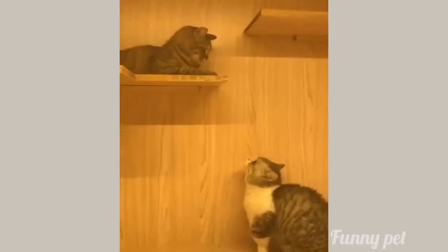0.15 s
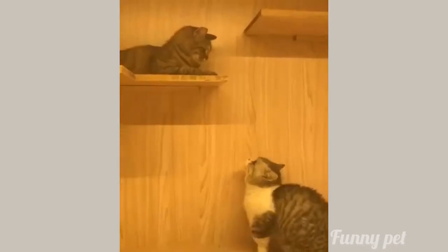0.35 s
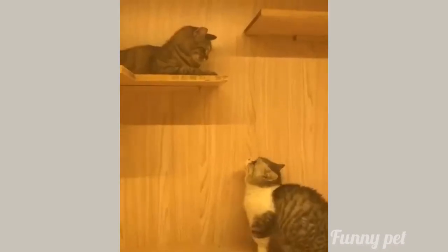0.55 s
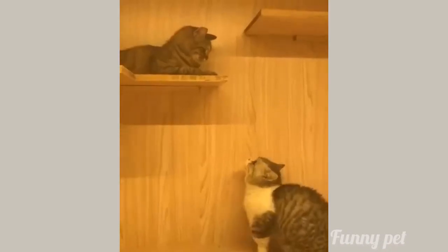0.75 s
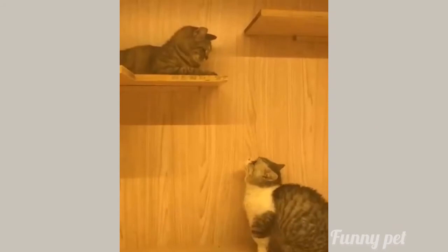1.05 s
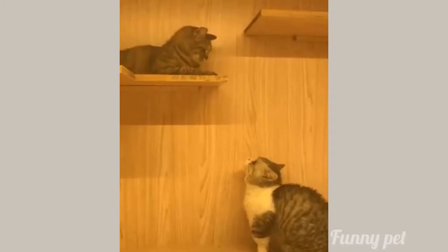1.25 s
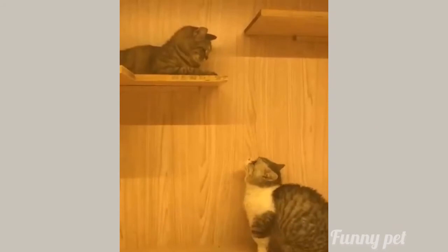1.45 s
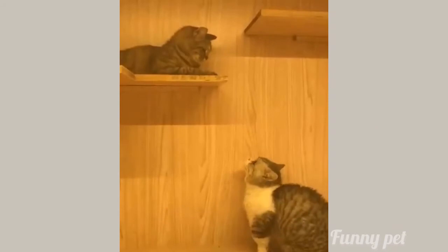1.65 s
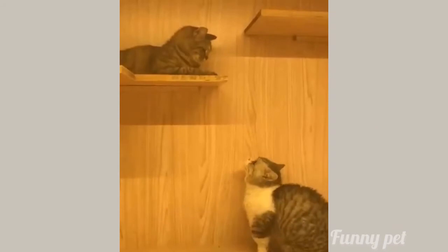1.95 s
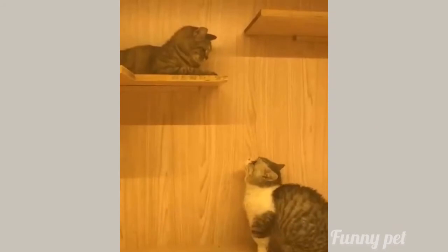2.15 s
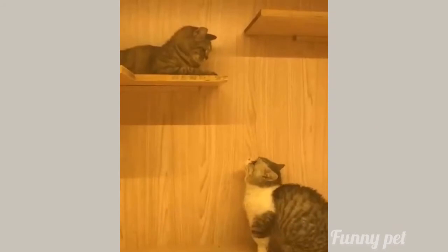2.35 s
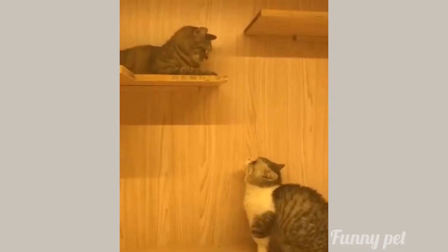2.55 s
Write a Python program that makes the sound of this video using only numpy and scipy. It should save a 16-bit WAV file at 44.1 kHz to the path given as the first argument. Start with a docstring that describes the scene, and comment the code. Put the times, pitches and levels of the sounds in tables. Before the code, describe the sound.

A cat's long, loud yowl rises about an octave, turns rough and breaks off in a rasp; after soft wooden knocks, a short yelp begins a second, lower yowl in a small wood-panelled room, close microphone.

```python
"""A long cat yowl comes first, over a low rumble: it climbs an octave as the mouth opens, splits into half-pitch
lines and breaks off in a rasp. After two soft knocks, a short yelp starts a second, lower yowl.
The place is a small wood-panelled room whose close walls answer the microphone at once. Each voice is a sum of
fold harmonics and half-pitch lines under moving resonances; hiss, rustles, knocks, thuds and rumble are shaped
noise; the gulps are sagging sines."""
import sys
import numpy as np
from scipy import signal
from scipy.fft import rfft, irfft
from scipy.io import wavfile
from scipy.ndimage import uniform_filter1d, minimum_filter1d

SR = 44100
rng = np.random.default_rng(int(sys.argv[2]) if len(sys.argv) > 2 else 0)


def file_out(sig):
    """Save sig as 16-bit WAV at sys.argv[1]."""
    # one column per channel
    cols = np.atleast_2d(sig).T
    # limit, then scale
    lim = np.clip(cols, -1, 1)
    pcm = np.round(lim * 32767).astype(np.int16)
    wavfile.write(sys.argv[1], SR, pcm)


N = 119070
T = np.arange(N) / SR  # s


def undb(db):
    """Decibels to amplitude gain."""
    return 10 ** (np.asarray(db) / 20)


def curves(rows):
    """Each column of a timed table, joined by straight lines."""
    rows = np.array(rows, float)
    return [np.interp(T, rows[:, 0], column) for column in rows.T[1:]]


def colour(points, hz):
    """Gain of a (frequency, level) outline at these frequencies, straight over log frequency."""
    f, db = np.array(points, float).T
    return undb(np.interp(np.log(hz + 1), np.log(f), db))


def noise(points):
    """Noise with this spectral outline, scaled to unit RMS."""
    hz = np.arange(N // 2 + 1) * SR / N
    x = irfft(rfft(rng.standard_normal(N)) * colour(points, hz), N)
    return x / x.std()


def wander(hz):
    """Random motion of unit RMS, no faster than about hz."""
    f = np.arange(N // 2 + 1) * SR / N
    x = irfft(rfft(rng.standard_normal(N)) / (1 + (f / hz) ** 4), N)
    return x / x.std()


def swells(rows):
    """A smooth rise and fall (a Gaussian) for each (time, length, level) row."""
    return sum(undb(db) * np.exp(-((T - at) / length) ** 2) for at, length, db in rows)


def resonance(hz, centre, width, db):
    """A peak of db over a flat base."""
    return 1 + (undb(db) - 1) / (1 + (2 * (hz - centre) / width) ** 2)


# steady noise of the room: (frequency [Hz], relative level [dB])
AIR_COLOUR = [(25, -3), (80, -5), (135, -4), (230, -13), (325, -9.5), (500, -13.5), (880, -14.5),
              (1330, -12.5), (2000, -18), (3600, -25.5), (4900, -34), (7000, -35), (9500, -43),
              (13000, -35.5)]
AIR_DB = -45.5
# deep rumble under the place: (time [s], level [dB])
RUMBLE_LEVEL = [(0, -26), (.15, -37), (.3, -61), (.68, -62), (.76, -38.5), (.86, -48), (.95, -54),
                (1.25, -44), (1.35, -49.5), (1.5, -48), (2.7, -62.5)]


def background():
    """Steady coloured noise, plus deep noise peaking near 33 Hz that comes and goes."""
    air = undb(AIR_DB) * noise(AIR_COLOUR)
    rumble = noise([(18, -26), (33, 21), (60, -24), (200, -43), (2000, -93)])
    return air + undb(curves(RUMBLE_LEVEL)[0]) * rumble


EARLY_DB, EARLY_T60_S, FIRST_ECHO_S = -5, 0.14, 0.0052
LATE_DB, LATE_T60_S = -11.5, 0.93  # decay time in the bass
DAMP_HZ = 7860  # the tail dies twice as fast here


def room(x):
    """Close walls answer at once; a weak tail lingers, duller as it fades."""
    t, f = T[:SR], np.arange(SR // 2 + 1)
    spectrum, tail = rfft(rng.standard_normal(SR)), 0
    centres = 125 * 2. ** np.arange(8)  # octave bands, Hz
    for hz, pick in zip(centres, np.eye(len(centres))):
        band = irfft(spectrum * np.interp(np.log(f + 1), np.log(centres), pick), SR)
        tail = tail + band * np.exp(-np.log(1000) * t * (1 + (hz / DAMP_HZ) ** 2) / LATE_T60_S)
    tail = tail * np.sqrt(2 * np.log(1000) / (LATE_T60_S * SR))  # about unit energy before damping
    early = rng.standard_normal(SR) * np.exp(-np.log(1000) * t / EARLY_T60_S) * (t > FIRST_ECHO_S)
    early = early / np.linalg.norm(early)
    echoes = undb(EARLY_DB) * early + undb(LATE_DB) * tail * (t > FIRST_ECHO_S)
    return (x + signal.fftconvolve(x, echoes)[:N]) / np.sqrt(1 + undb(EARLY_DB) ** 2)


RING_HZ, RING_T60_S, RING_DB = 2030, 1.33, -14


def ring(x):
    """The lingering band of the room: a decaying sine driven by the yowls."""
    t = T[:SR]
    decay = np.exp(-np.log(1000) * t / RING_T60_S)
    response = 2 * decay * np.sin(2 * np.pi * RING_HZ * t) / decay.sum()  # about unit gain at RING_HZ
    return undb(RING_DB) * signal.fftconvolve(x, response)[:N]


# soft knocks on wood: (time [s], level [dB])
KNOCK_HITS = [(1.741, -31.5), (1.768, -40), (1.795, -41), (2.11, -27.5), (2.144, -41)]
# dull spectrum of the wood: (frequency [Hz], relative level [dB])
KNOCK_SPECTRUM = [(40, -17), (85, -4.5), (170, 0), (300, 1.5), (700, -2.5), (1400, -9), (2200, -21),
                  (3500, -29.5), (7000, -44), (13000, -52)]
KNOCK_DECAY_S = 0.011  # to 1/e


def knocks():
    """Dull noise that starts at each hit and dies exponentially."""
    hits = sum(undb(db) * (T >= at) * np.exp(-abs(T - at) / KNOCK_DECAY_S) for at, db in KNOCK_HITS)
    return hits * noise(KNOCK_SPECTRUM)


# faint rustles: (time [s], length [s], level [dB])
RUSTLE_SWELLS = [(1.874, .025, -46.5), (1.935, 0.023, -42), (2.153, 0.029, -46.5), (2.289, 0.023, -39.5)]
# their spectrum: (frequency [Hz], relative level [dB])
RUSTLE_SPECTRUM = [(200, 6.5), (1200, 0.5), (3000, -13), (6000, -18), (11000, -13.5), (13000, -16)]


def rustles():
    """Brief swells of broad, faint noise."""
    return swells(RUSTLE_SWELLS) * noise(RUSTLE_SPECTRUM)


# soft low thuds: (time [s], length [s], level [dB])
THUD_SWELLS = [(1.38, 0.1, -40), (1.79, .03, -38), (2.16, 0.043, -37.5)]
# their spectrum: (frequency [Hz], relative level [dB])
THUD_SPECTRUM = [(40, -25), (70, -3), (82, -3.5), (105, -27), (135, -14.5), (200, -32), (2000, -82)]


def thuds():
    """Brief swells of noise, strongest around 75 Hz."""
    return swells(THUD_SWELLS) * noise(THUD_SPECTRUM)


# low gulps at the edges of the yowls: (time [s], length [s], pitch [Hz], level [dB])
GULP_TONES = [(0.011, 0.02, 635, -20.5), (1.022, 0.013, 634, -21), (1.029, 0.0073, 321, -23.5),
              (2.333, 0.0085, 526, -26.5)]
GULP_SAG_PER_S = 0.74  # share of the pitch lost in a second


def gulps():
    """Brief, almost pure hollow tones that sag a little in pitch."""
    out = 0
    for at, length, hz, db in GULP_TONES:
        t = T - at
        swell = undb(db) * np.exp(-(t / length) ** 4)
        out = out + swell * np.sin(2 * np.pi * hz * (t - GULP_SAG_PER_S * t ** 2 / 2))
    return out


# spitting hiss over the yelp: (time [s], length [s], level [dB])
SPIT_SWELLS = [(2.335, 0.014, -36)]
# its spectrum: (frequency [Hz], relative level [dB])
SPIT_SPECTRUM = [(500, -28), (1500, -8), (2700, -10), (3100, -4), (3900, -8), (4500, -23), (5800, -12),
                 (7500, -34), (13000, -30)]


def spit():
    """A short swell of hissing noise."""
    return swells(SPIT_SWELLS) * noise(SPIT_SPECTRUM)


LOCK_S, LOCK_RISE_S, LOCK_DB, LOCK_FALL_S = .657, .007, 5, .04


def lock():
    """Gain jump of the first yowl as a partial locks onto the mouth resonance; it settles exponentially in dB."""
    late = np.maximum(T - LOCK_S, 0)
    return undb(LOCK_DB * np.minimum(late / LOCK_RISE_S, 1) * np.exp(-late / LOCK_FALL_S))


OPEN_HZ = 2037  # mouth resonance of an open mouth
CLOSED_TREBLE_DB, TREBLE_HZ = -11.5, 2130  # muffling per octave of closing, in full from TREBLE_HZ up
DIP_RATIO, DIP_OCTAVES, DIP_DB = 0.65, 0.27, -11  # centre over top resonance, width, dB per octave of closing
HALF_LOW_HZ = 740  # half-pitch lines fade below this
JITTER, RASP_JITTER, JITTER_HZ = .002, .03, 55.6  # pitch wobble as a share; the second scales with rasp
SHIMMER_DB = 1.0  # RMS level wobble
RASP_WIDTH_HZ, RASP_REF_HZ, RASP_TILT = 140, 2000, 0.74  # rasp grows as this power of frequency
FADE_S = .006  # the folds start and stop within this time


def voice(pitch, effort, hoarse, throat, shape, count=76):
    """Fold harmonics and half-pitch lines, each with a raspy skirt, through three moving resonances."""
    start, end = effort[0][0], effort[-1][0]
    on = (T >= start) & (T <= end)
    f0, = [c[on] for c in curves(pitch)]
    db, mouth, upper, upper_db, top = [c[on] for c in curves(effort)]
    half_db, rasp_db = [c[on] for c in curves(hoarse)]
    mouth_width, mouth_db, upper_width, top_width, top_db, half_top = shape

    wobble = (JITTER + RASP_JITTER * undb(rasp_db)) * wander(JITTER_HZ)[on]
    phase = np.pi * np.cumsum(f0 * (1 + wobble)) / SR  # of the half-pitch
    gain = undb(db + SHIMMER_DB * wander(JITTER_HZ)[on])
    flutter = (wander(RASP_WIDTH_HZ) + 1j * wander(RASP_WIDTH_HZ)) / np.sqrt(2)
    closed = np.log2(np.maximum(OPEN_HZ / mouth, 1))  # octaves

    wave, power, out = 0, 0, np.zeros(N)
    for k in range(1, count):  # even k: harmonics, odd k: half-pitch lines
        hz = k * f0 / 2
        size = colour(throat, hz) * resonance(hz, mouth, mouth_width, mouth_db)
        size = size * resonance(hz, upper, upper_width, upper_db) * resonance(hz, top, top_width, top_db)
        hollow = np.exp(-(np.log2(hz / (DIP_RATIO * top)) / DIP_OCTAVES) ** 2)
        treble = np.clip(hz / TREBLE_HZ * 2 - 1, 0, 1)
        size = size * undb(closed * (CLOSED_TREBLE_DB * treble + DIP_DB * hollow))
        line = 1
        if k % 2:
            line = undb(half_db) * hz ** 2 / (hz ** 2 + HALF_LOW_HZ ** 2)
            line = line / np.hypot(1, (hz / half_top) ** 6)
        rasp = np.minimum(undb(rasp_db) * (hz / RASP_REF_HZ) ** RASP_TILT, 1)
        skirt = rasp * np.roll(flutter, rng.integers(N))[on]
        turn = np.exp(1j * (k * phase + rng.uniform(0, 2 * np.pi)))
        wave = wave + size * np.real((line + skirt) * turn)
        power = power + size ** 2 * (line ** 2 + rasp ** 2) / 2
    fade = np.clip(np.minimum(T[on] - start, end - T[on]) / FADE_S, 0, 1)
    out[on] = fade * gain * wave / np.sqrt(power)  # effort alone sets the level
    return out


# pitch of the vocal folds: (time [s], pitch [Hz])
YELP_PITCH = [(2.31, 557), (2.33, 510.7), (2.36, 470)]
# effort and mouth: (time [s], level [dB], mouth resonance [Hz], upper resonance [Hz],
# upper resonance peak [dB], top resonance [Hz])
YELP_EFFORT = [(2.317, -30.5, 520, 1530, 8.2, 5840), (2.326, -12.5, 530, 1590, 21.6, 5770),
               (2.335, -20.5, 520, 1500, 22, 5800), (2.345, -20, 510, 1440, 4.3, 5830),
               (2.351, -40, 500, 1390, 6, 5800)]
# how the folds misbehave: (time [s], half-pitch lines [dB], rasp at RASP_REF_HZ [dB])
YELP_HOARSE = [(2.31, -36, -17), (2.36, -24, -4)]
# throat colour under the moving resonances: (frequency [Hz], relative level [dB])
YELP_THROAT = [(250, -20), (500, 5.5), (1050, 12), (2000, -0.5), (2600, 8), (3500, 19), (4500, -16),
               (6000, -5), (8000, -20), (13000, -23)]
# fixed shape: (mouth width [Hz], mouth peak [dB], upper width [Hz], top width [Hz], top peak [dB],
# half-pitch lines fade above [Hz])
YELP_SHAPE = (100, 11, 140, 500, 9.6, 4000)


def yelp():
    """The short falling cry that starts the second yowl."""
    return voice(YELP_PITCH, YELP_EFFORT, YELP_HOARSE, YELP_THROAT, YELP_SHAPE, count=44)


# pitch of the vocal folds: (time [s], pitch [Hz])
SECOND_PITCH = [(2.28, 325), (2.33, 344.1), (2.36, 376), (2.4, 409.7), (2.45, 430.4), (2.5, 445.9),
                (2.55, 459.2), (2.6, 457.8), (2.64, 471.4), (2.7, 470)]
# effort and mouth: (time [s], level [dB], mouth [Hz], upper [Hz], upper peak [dB], top [Hz])
SECOND_EFFORT = [(2.28, -70, 1100, 2100, -4, 5700), (2.322, -25.5, 1130, 2100, -5, 5870),
                 (2.36, -31, 1240, 2120, 9, 6300), (2.4, -22.5, 1390, 2310, 18.5, 6300),
                 (2.436, -28.5, 1480, 2530, 16.5, 7800), (2.471, -16.5, 1550, 2420, 19.5, 6650),
                 (2.52, -20.5, 1585, 2610, 13.5, 5330), (2.6, -20.5, 1580, 2530, 13.5, 5160),
                 (2.64, -20.5, 1790, 3078, 21, 5200), (2.7, -17, 1840, 2980, 12, 5400)]
# misbehaving folds: (time [s], half-pitch lines [dB], rasp at RASP_REF_HZ [dB])
SECOND_HOARSE = [(2.28, -26, -25), (2.39, -22, -40), (2.44, -6, -29), (2.49, 6.5, -37), (2.56, -1.5, -32),
                 (2.7, 2, -33)]
# throat colour: (frequency [Hz], relative level [dB])
SECOND_THROAT = [(200, -8), (450, -21.5), (900, -8), (1180, -6.5), (1400, 1), (2050, 5), (3000, -5.5),
                 (3500, -4), (3950, -15.5), (5300, -14.5), (6500, -20), (7600, -12), (10000, -28),
                 (13000, -24)]
# shape: (mouth width [Hz], mouth peak [dB], upper width [Hz], top width [Hz], top peak [dB], half fade [Hz])
SECOND_SHAPE = (430, 15.3, 440, 800, 7, 4100)


def second_yowl():
    """The lower yowl, rising as its mouth resonance opens."""
    return voice(SECOND_PITCH, SECOND_EFFORT, SECOND_HOARSE, SECOND_THROAT, SECOND_SHAPE)


# pitch of the vocal folds: (time [s], pitch [Hz])
FIRST_PITCH = [(0, 322.2), (.04, 314.3), (.1, 306.6), (.17, 315.4), (.25, 339.3), (.31, 366.2),
               (.37, 399.7), (.42, 432), (.47, 499), (.51, 534), (.56, 564.7), (.62, 569.7), (.68, 586.2),
               (.77, 579), (.82, 608.5), (.89, 660.3), (.93, 677.7), (.968, 692), (1., 674.2), (1.03, 615),
               (1.07, 455)]
# effort and mouth: (time [s], level before lock() [dB], mouth [Hz], upper [Hz], upper peak [dB], top [Hz])
FIRST_EFFORT = [(0, -26.5, 740, 2600, 15, 5730), (0.031, -26, 864, 2810, 25.5, 5100),
                (0.068, -18.5, 917, 2570, 22.5, 4770), (0.159, -19.5, 988, 2340, 12, 5440),
                (0.199, -22, 1040, 2250, 20.5, 5600), (0.241, -20, 1194, 2130, 16.5, 5660),
                (0.309, -14.5, 1134, 2130, 12.5, 6140), (0.383, -17.5, 1580, 2430, 24.5, 6590),
                (0.501, -13.5, 1860, 2950, 21.5, 5950), (0.582, -13.5, 1968, 3080, 11, 6160),
                (.65, -12.5, 1992, 3450, 13.5, 6197), (.667, -10, 2035, 2960, 4, 6000),
                (.785, -9, 2090, 2880, 13, 5886), (0.819, -11, 2040, 2910, 24, 6503),
                (0.854, -15, 1950, 3145, 15.5, 6800), (0.882, -8.5, 1982, 3300, 15, 6800),
                (.93, -7, 2000, 2750, 22.5, 6984), (0.959, -11, 1970, 2780, 1, 7240),
                (1., -15, 1907, 2800, 20.5, 7244), (1.033, -19.5, 1520, 2700, 17, 6230),
                (1.06, -17.5, 1420, 2850, 8.5, 6400), (1.085, -19.5, 1190, 2730, 14, 6343)]
# misbehaving folds: (time [s], half-pitch lines [dB], rasp at RASP_REF_HZ [dB])
FIRST_HOARSE = [(0, -45, -22.5), (0.251, -32, -25.5), (.38, -20, -21), (.46, -11, -16), (.53, -8, -17.5),
                (.58, 2.5, -21.5), (.65, 0, -24.5), (.68, 8, -39), (.77, 10, -38), (.81, 1.5, -16.5),
                (.85, 4, -11.5), (.89, -6, -16.5), (.98, -14, -19.5), (1.019, -6, -13.5), (1.06, -7, -2)]
# throat colour: (frequency [Hz], relative level [dB])
FIRST_THROAT = [(200, -3), (310, -7), (450, -7), (750, -12), (1100, -3.5), (1350, -0.5), (1650, -6.5),
                (2400, -3.5), (3400, -3.5), (4300, -5.5), (5100, -8.5), (5800, -14), (7200, -16.5),
                (8500, -20), (9600, -15.5), (10600, -28.5), (13000, -26)]
# shape: (mouth width [Hz], mouth peak [dB], upper width [Hz], top width [Hz], top peak [dB], half fade [Hz])
FIRST_SHAPE = (215, 24.87, 377, 600, 9.7, 11900)


def first_yowl():
    """The long climbing yowl, with its jump in level, that splits and ends in a rasp."""
    return lock() * voice(FIRST_PITCH, FIRST_EFFORT, FIRST_HOARSE, FIRST_THROAT, FIRST_SHAPE)


def scene():
    """Cats and small movements heard through the room, over its background."""
    movements = knocks() + rustles() + thuds()
    yowls = first_yowl() + second_yowl()
    sources = yowls + yelp() + spit() + gulps() + movements
    return (room(sources) + ring(yowls) + background())[None]


CEILING, LIMIT_S = .93, 0.0065  # peak level (full scale 1), ducking window
TOP_HZ = 13200


def record(dry):
    """The recorder behind the microphone ducks the loudest peaks and cuts the top."""
    size = int(LIMIT_S * SR) + 1
    needed = np.minimum(1, CEILING / (abs(dry) + 1e-9))
    gain = uniform_filter1d(minimum_filter1d(needed, size), size)
    top_cut = signal.ellip(10, .2, 80, TOP_HZ, fs=SR, output="sos")
    return signal.sosfilt(top_cut, dry * gain)


dry = scene()
out = record(dry)
file_out(out)
```